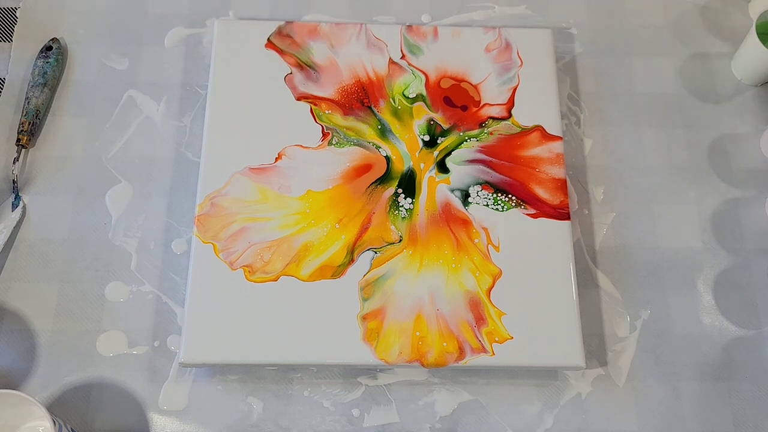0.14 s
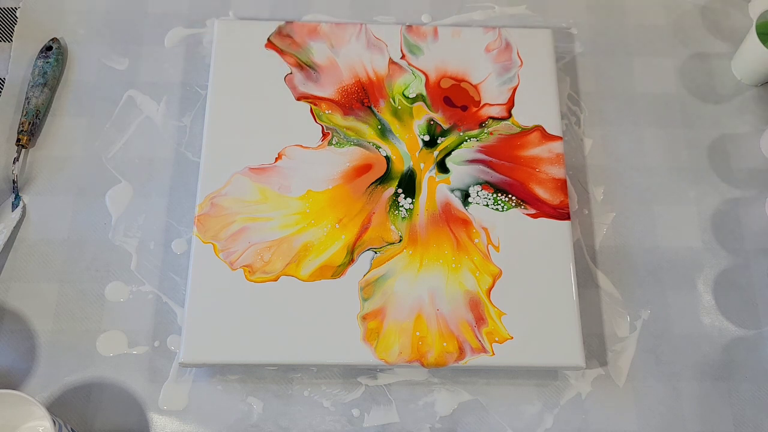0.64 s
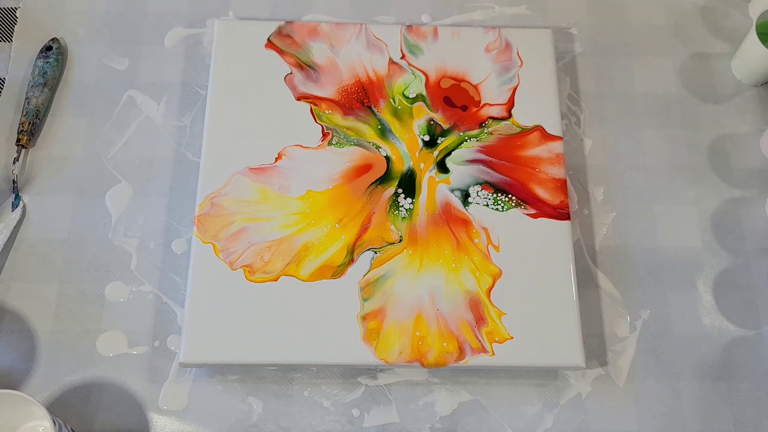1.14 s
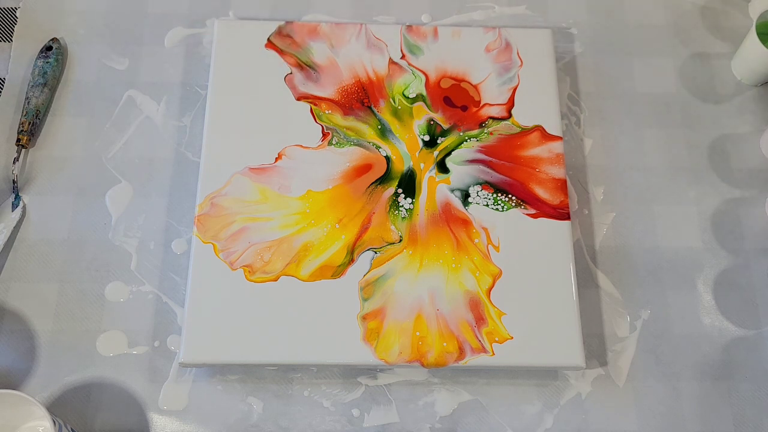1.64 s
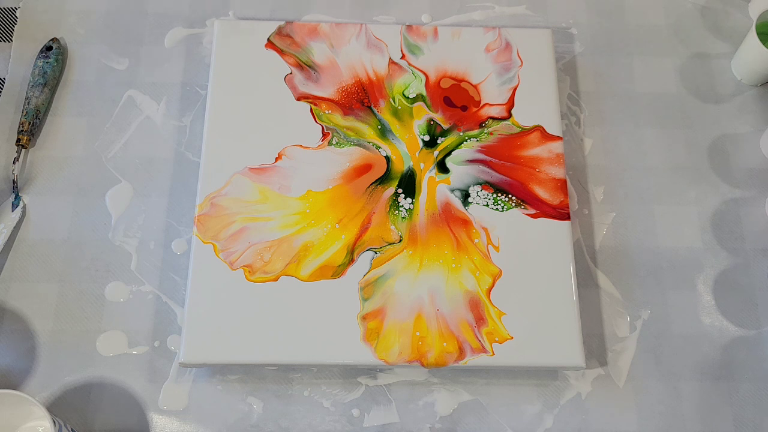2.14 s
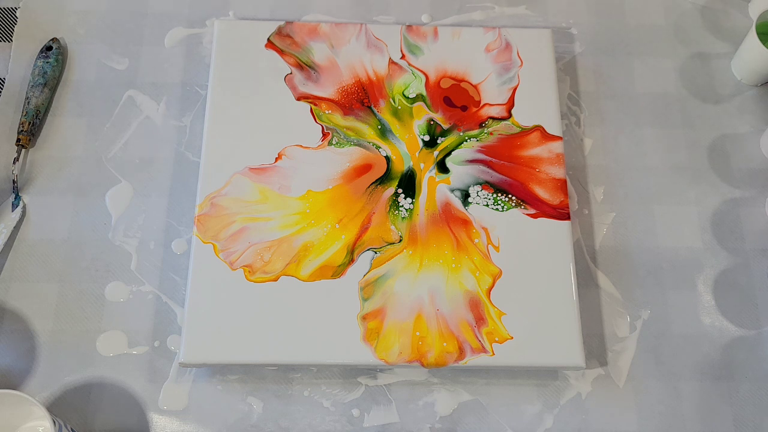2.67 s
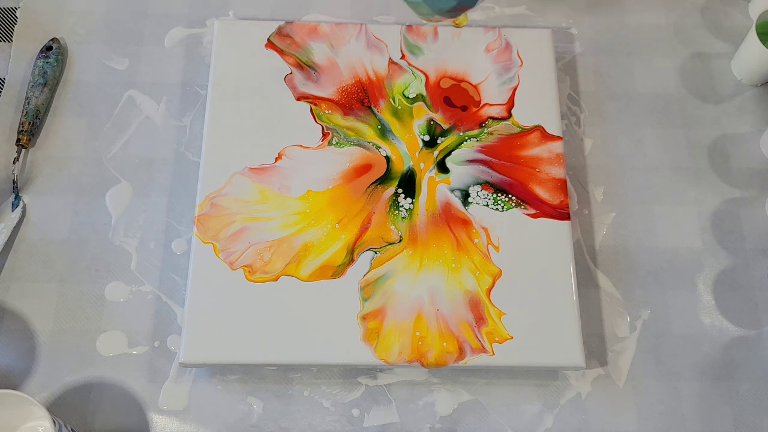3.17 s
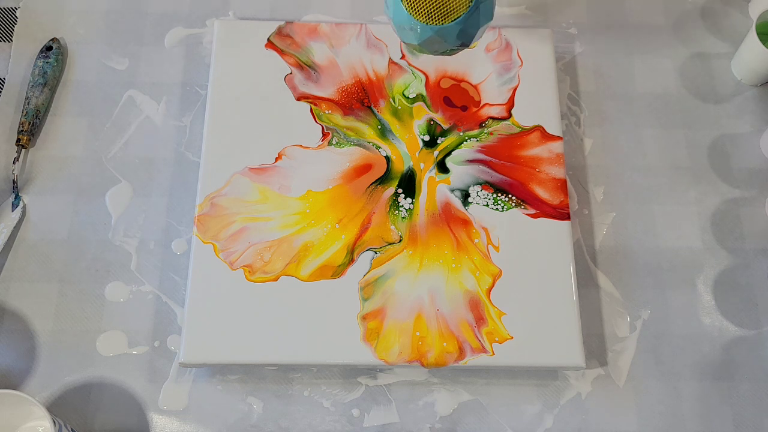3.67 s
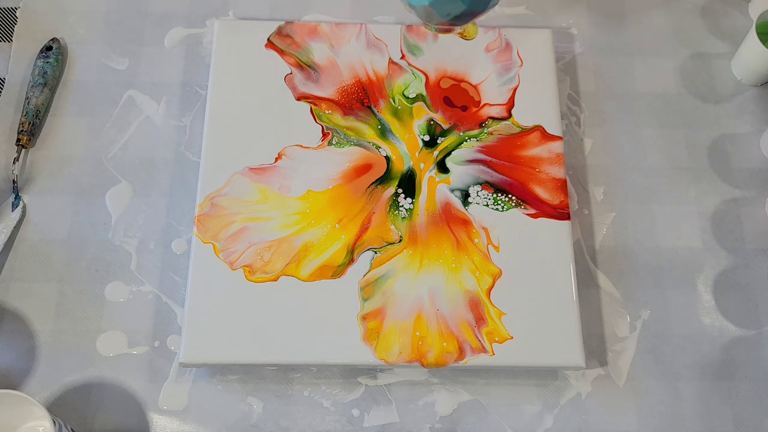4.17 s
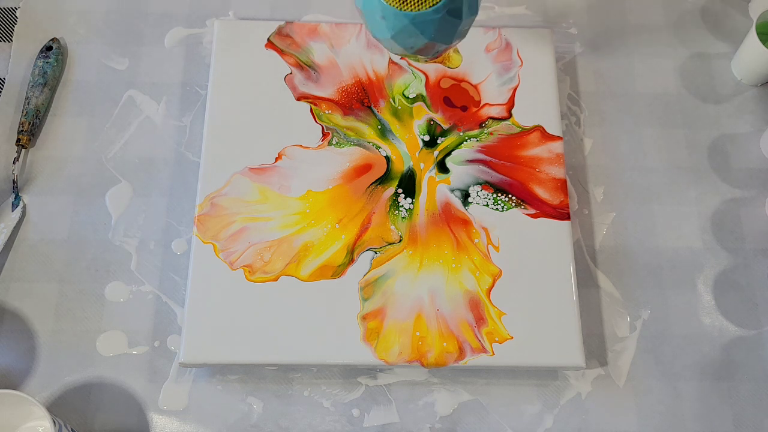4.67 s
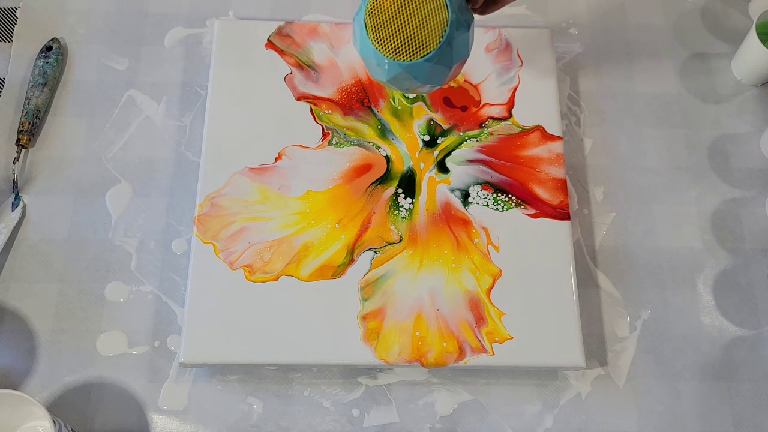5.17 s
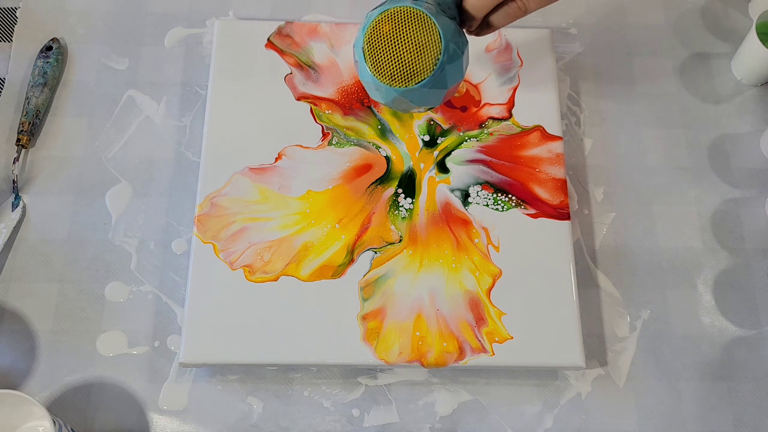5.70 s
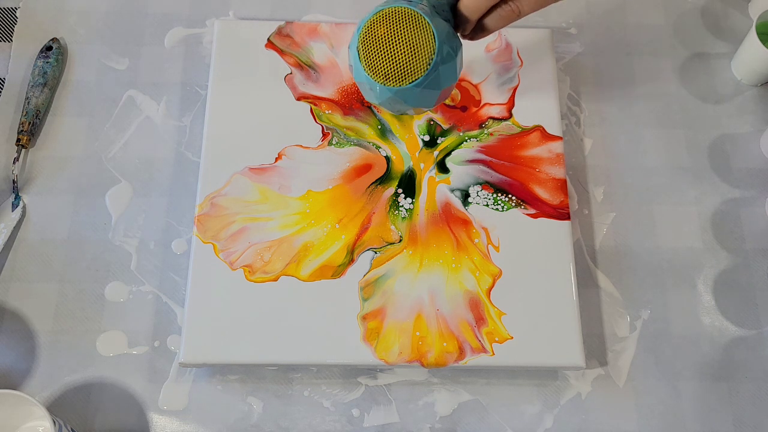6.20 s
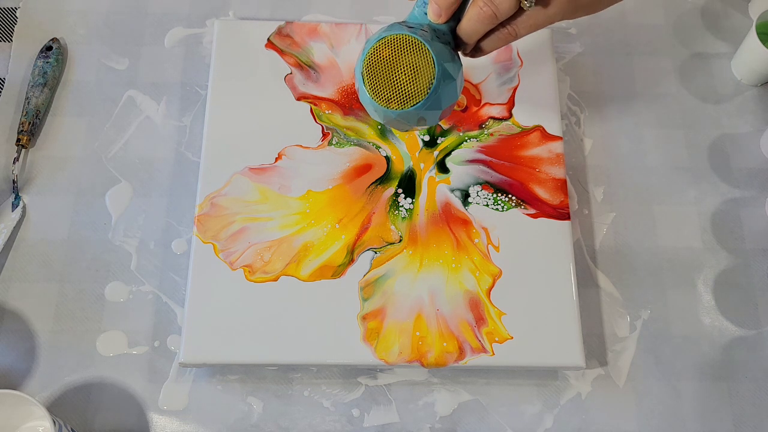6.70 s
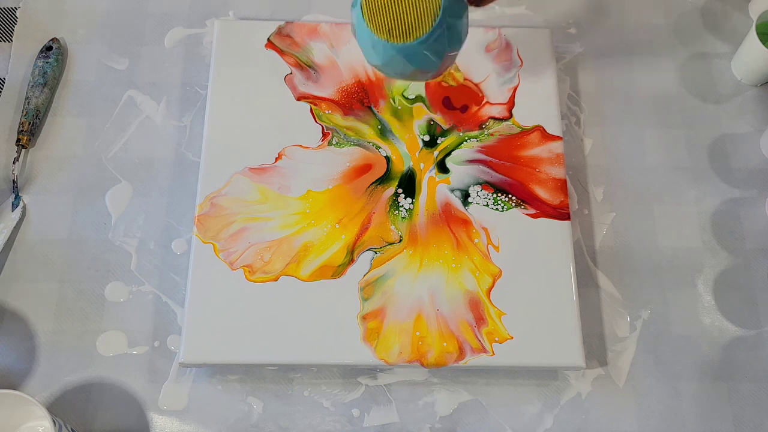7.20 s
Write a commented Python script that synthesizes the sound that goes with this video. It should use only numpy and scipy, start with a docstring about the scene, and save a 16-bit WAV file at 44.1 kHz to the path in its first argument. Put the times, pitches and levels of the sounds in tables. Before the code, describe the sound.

A sharp plastic click in a small room starts a handheld dryer, its motor tone climbing into a constant roar of air and piercing whine.

```python
"""In a small room a low machine hum (noise lines and a clean tone) lies under a faint hiss of handling.
The switch is touched, then thrown: bursts of rattle excite its housing modes, and the room answers.
The motor spins up exponentially; its tones climb with the turning rate past the casing modes.
Air roars through barrel and grille as turbulence noise, shaped by resonances and growing with speed.
The hand then moves the hair dryer about over a table: blade tone and a sliding airy band follow it."""
import sys
import numpy as np
from scipy import signal
from scipy.fft import rfft, irfft, next_fast_len
from scipy.io import wavfile

SR = 44100
rng = np.random.default_rng(int(sys.argv[2]) if len(sys.argv) > 2 else 0)


def field_ratio(decibels):
    """Amplitude ratio for a level in dB (20 dB per decade); scalars and array-likes work."""
    return 10 ** (np.asarray(decibels, dtype=float) / 20)


def materialize(psi):
    """Save the field psi as 16-bit PCM at rate SR to the path in sys.argv[1].

    A 1-D psi becomes a single channel; in a 2-D psi each row is a channel.
    """
    bounded = np.clip(np.atleast_2d(psi).T, -1, 1)
    quanta = np.round(bounded * 32767).astype(np.int16)
    wavfile.write(sys.argv[1], SR, quanta)


N = 323253
TIME_S = np.arange(N) / SR
SIZE = next_fast_len(N + SR // 2)   # room for half a second of echo
FREQ = np.maximum(np.fft.rfftfreq(SIZE, 1 / SR), 1)
LEFT_RIGHT = np.array([[1], [-1]])   # signs of an opposed (side) part
MAINS_HZ = 60


def rms_one(x):
    """Normalisation: scales a signal to unit root-mean-square."""
    return x / np.sqrt(np.mean(x ** 2) + 1e-20)


def in_time(rows):
    """Linear interpolation: each column after t becomes one value a sample."""
    s, *columns = np.transpose(rows)
    return np.array([np.interp(TIME_S, s, column) for column in columns])


def at_hz(points, hz=FREQ):
    """Spectral envelope: levels interpolated on a logarithmic frequency axis."""
    point_hz, level_db = np.array(points).T
    return np.interp(np.log(hz), np.log(point_hz), level_db)


def drift(rate_hz):
    """Low-pass random process: noise through two equal poles at rate_hz, scaled to unit rms."""
    r = np.exp(-80 * np.pi * rate_hz / SR)   # one step each 40 samples
    noise = rng.standard_normal(N // 40 + 2002)
    slow = rms_one(signal.lfilter([1], [1, -2 * r, r * r], noise)[2000:])
    return np.interp(np.arange(N) / 40, np.arange(len(slow)), slow)


def lorentzian(hz, centre_hz, width_hz):
    """Resonance curve: 1 at the centre, one half at half the width to either side."""
    return 1 / (1 + (2 * (hz - centre_hz) / width_hz) ** 2)


def to_time(spectra):
    """Fourier synthesis: spectra become samples."""
    return irfft(spectra, SIZE)[..., :N]


def stereo_noise(colour_db, side_db):
    """Partial coherence: left and right noise spectra share a mid part and oppose a side part."""
    mid, side = rfft(rng.standard_normal((2, SIZE)))
    return (mid + field_ratio(side_db) * side * LEFT_RIGHT) * field_ratio(colour_db)


def resonance(x, hz, width_hz):
    """Damped mode: a two-pole band-pass with gain near 1 at its peak."""
    r = np.exp(-np.pi * width_hz / SR)
    zeros = np.array([1, 0, -1]) * (1 - r * r) / 2
    poles = [1, -2 * r * np.cos(2 * np.pi * hz / SR), r * r]
    return signal.lfilter(zeros, poles, x + 1e-18)


def room_response(count, t60):
    """Diffuse reverberation: spectra of unrelated, exponentially dying noise, mean power 1."""
    lag = np.arange(SR // 2) / SR
    tails = rng.standard_normal((count, len(lag))) * field_ratio(-60 * lag / t60) * (lag > .002)
    return rfft(tails / np.sqrt(np.sum(tails ** 2, axis=1, keepdims=True)), SIZE)


# colour of the steady background: f/Hz, relative density/dB
BACKGROUND_COLOUR = [(18, -44), (30, -17), (120, -3.5), (182, -11), (359, -22.5), (410, -34), (546, -30),
                     (606, -35), (1050, -44), (3490, -48), (7260, -56), (8720, -52), (15500, -59)]
# its stereo width: f/Hz, side minus mid level/dB
BACKGROUND_SIDE = [(60, -18), (180, -13.5), (550, 3), (1650, 2), (4970, 1), (15000, -17)]
# noisy lines of the machine hum: f/Hz, width/Hz, rms level/dB
HUM_LINES = [(63, 4.8, -64), (102.3, 7.2, -57), (117, 4.5, -58.5), (153, 10, -69)]
# faint hiss of handling: t/s, rms level/dB
HANDLING_HISS = [(0.0, -66), (0.114, -79), (0.2, -74), (0.216, -71), (0.266, -83), (0.64, -99), (.7, -120)]


def room_tone():
    """Superposition of steady coloured noise, noisy hum lines, a wavering tone and a faint hiss."""
    side_db = at_hz(BACKGROUND_SIDE)
    out = field_ratio(-55) * rms_one(to_time(stereo_noise(at_hz(BACKGROUND_COLOUR), side_db)))
    for hz, width, db in HUM_LINES:
        shape_db = 20 * np.log10(lorentzian(FREQ, hz, width))
        out += field_ratio(db) * rms_one(to_time(stereo_noise(shape_db, side_db)))
    # clean part of the hum, at twice the mains rate
    out += field_ratio(-55 + 3.3 * drift(1.4)) * np.sqrt(2) * np.sin(4 * np.pi * MAINS_HZ * TIME_S)
    hiss = rms_one(to_time(stereo_noise(at_hz([(800, -30), (3000, 1), (16000, -1)]), -2)))
    return out + field_ratio(in_time(HANDLING_HISS)) * hiss


# moments at which the switch is touched and thrown: t/s, relative level/dB
SNAP_TIMES = [(0.213, -60), (0.312, -72), (0.658, -25.5), (0.674, -44)]
# modes of switch and housing: f/Hz, relative level/dB, decay time t60/s
HOUSING_MODES = [(945, -2, .012), (1370, 0, 0.0059), (1710, -7, .012), (2330, 3.5, 0.008),
                 (3460, -11, .008), (4600, -9, .006), (6300, -13, .004), (8440, -15, .003)]


def switch():
    """Impact excitation: milliseconds of rattle drive damped modes, and diffuse echoes follow."""
    kicks = np.zeros(N)
    for s, db in SNAP_TIMES:
        since = np.maximum(TIME_S - s, 0)
        kicks += field_ratio(db - 2.5) * (1 - np.exp(-since / 0.0011)) * np.exp(-since / 0.005)
    kicks *= rng.standard_normal(N)
    direct = 0.26 * signal.sosfilt(signal.butter(2, 900, "high", fs=SR, output="sos"), kicks)
    for hz, db, t60 in HOUSING_MODES:
        direct += field_ratio(db + 4.0) * resonance(kicks, hz, np.log(1000) / np.pi / t60)
    wall = 1 / (1 + 1j * FREQ / 12000)   # walls absorb the treble
    echoes = rfft(direct, SIZE) * wall * room_response(count=2, t60=0.37)
    return direct + field_ratio(4.5) * to_time(echoes)


TOP_SPEED_HZ, SWITCH_S, SPIN_UP_S = 249.75, .655, .36   # turns a second, onset, time constant


def turning_speed():
    """First-order response: the share of top speed rises exponentially towards 1."""
    return 1 - np.exp(-np.maximum(TIME_S - SWITCH_S, 0) / SPIN_UP_S)


def turn_angle():
    """Phase as the integral of frequency: the shaft angle in radians."""
    return 2 * np.pi * np.cumsum(TOP_SPEED_HZ * turning_speed()) / SR


# motor modes that brush noise keeps ringing in the casing: f/Hz, width/Hz, mid rms level at full speed/dB
BRUSHED_MODES = [(2499, 34, -49.5), (3367, 99, -52.5)]
# casing modes that a rising motor tone sweeps through: multiple, f/Hz, width/Hz, level/dB
SWEPT_MODES = [(8, 745, 9, -37.5), (10, 915, 9, -36.5)]


def casing():
    """Forced vibration: rising tones sweep through casing modes, and brush noise keeps others ringing."""
    turns, speed = turn_angle(), turning_speed()
    ringing = 0
    for k, hz, width, db in SWEPT_MODES:
        ringing = ringing + field_ratio(db) * resonance(resonance(np.sin(k * turns), hz, width), hz, 80)
    brushes = rng.standard_normal((2, N))
    for hz, width, db in BRUSHED_MODES:
        mid, side = rms_one(resonance(resonance(brushes, hz, width), hz, 3 * width))
        ringing = ringing + field_ratio(db) * speed ** 2.9 * (mid + 1.33 * side * LEFT_RIGHT)
    return ringing


# blade tone as the hand carries it through the standing waves:
# t/s, mean of left and right level at full speed/dB, left minus right level/dB
BLADE_PATH = [(2.2, -47, -10.5), (2.24, -38, -11), (2.31, -39.5, 3), (2.59, -39, -7), (2.73, -34.5, 2.0),
              (3.16, -40, -10), (3.5, -31, 7), (3.59, -35.5, 1.0), (3.69, -34.5, 6), (4.17, -32.5, 6),
              (4.31, -42.5, 6), (4.41, -36, 0.0), (4.77, -41, 4), (5.78, -34.5, 3.5), (5.83, -33, 11),
              (5.89, -37, 4.5), (5.94, -31.5, 10.5), (6.03, -37.5, 3), (6.37, -34, 7), (7.17, -36, 4),
              (7.33, -38.5, 9)]
# pitches where the climbing tone swells: f/Hz, width/Hz, boost/dB
PITCH_SWELLS = [(1330, 300, 8), (1845, 60, 6)]


def blade_level(speed, flutter_db=0.96):
    """Standing waves: left and right dB swell and fade during the climb, then follow the hand."""
    level_db, pan_db = in_time(BLADE_PATH)
    held = level_db + pan_db * LEFT_RIGHT / 2
    pitch_hz = 8 * TOP_SPEED_HZ * speed
    swell = sum(db * lorentzian(pitch_hz, hz, width) for hz, width, db in PITCH_SWELLS)
    # chance fades: the rising tone crosses peaks and nulls of the room
    climbing = -46 + swell + 2.5 * np.array([drift(8.3), drift(8.3)])
    settled = np.clip((TIME_S - 2.19) / .05, 0, 1)
    flutter = flutter_db * np.array([drift(23.0), drift(23.0)])
    growth = 3.5 * 20 * np.log10(speed + 1e-6)   # amplitude as speed to the power 3.5
    return climbing + settled * (held - climbing) + growth + flutter


# other tones of the motor: cycles per turn
TONE_MULTIPLES = [1, 5, 6, 15, 16, 20, 23, 24]
# mean level of each at full speed: left level/dB, right level/dB
TONE_LEVELS = [(-87, -65.5), (-50, -43.5), (-76, -62), (-74, -59.5), (-67, -56), (-57, -55.5), (-60, -71),
               (-62, -67)]


def motor(ripple=.2, waver_db=1.8, rise_db=85):
    """Harmonic series of the turning rate, its amplitude modulated by the rectified mains."""
    speed, turns = turning_speed(), turn_angle()
    out = field_ratio(blade_level(speed)) * np.sin(8 * turns)   # eight blades pass each turn
    for k, level_db in zip(TONE_MULTIPLES, TONE_LEVELS):
        waver = waver_db * np.array([drift(1.5), drift(1.6)])   # as the hand moves
        level = np.array(level_db)[:, None] + waver + rise_db * np.log10(speed + 1e-3)
        phase = rng.uniform(-1.1, 1.1, (2, 1))   # radians, differing at each microphone
        out += field_ratio(level) * np.sin(k * turns + phase)
    throb = np.sqrt(2) * (1 + ripple * np.sin(2 * np.pi * MAINS_HZ * TIME_S))
    return throb * out


# how far the hand turns the dryer away from the microphones: t/s, level/dB
HAND_AIM = [(.8, -7.5), (1.2, -5.5), (1.7, -5), (1.9, -3.5), (2.3, -4), (2.5, -1.5), (2.7, -1.5),
            (3.0, -0.5), (4.0, -0.5), (4.4, 0.3), (5.1, -0.64), (5.7, -0.5), (5.9, -2), (6.5, -0.4),
            (6.9, -2), (7.33, -1.2)]
# airy band that slides as the hand moves the nozzle: t/s, f/Hz, rms level at full speed and 0 dB aim/dB
SLIDING_PATH = [(2.2, 2460, -37), (3.2, 2587, -41), (3.3, 2442, -44), (4.26, 2473, -43), (4.3, 2580, -45),
                (5.17, 2460, -46.5), (7.3, 2500, -45), (7.33, 2530, -43)]


def sliding_band(width_hz=130, side_db=-20):
    """Quadrature modulation: low-pass noise on a moving carrier, stronger as the dryer turns to face."""
    hz, level_db = in_time(SLIDING_PATH)
    (aim_db,) = in_time(HAND_AIM)
    phase = 2 * np.pi * np.cumsum(hz) / SR
    low = signal.butter(2, width_hz / 2, fs=SR, output="sos")
    a, b = signal.sosfilt(low, rng.standard_normal((2, 2, N)))
    mid, side = rms_one(a * np.cos(phase) + b * np.sin(phase))
    stereo = mid + field_ratio(side_db) * side * LEFT_RIGHT
    return field_ratio(level_db + 2.1 * aim_db) * turning_speed() ** 3 * stereo


# stereo width of the echoes of the air: f/Hz, side minus mid level/dB
ECHO_SIDE = [(150, -8), (300, -4), (600, -2.5), (1200, -3), (1800, -8), (2600, -7), (4200, -5.5),
             (6500, -4), (8000, -6), (10000, -6.5), (12000, -4), (15000, -4.5)]
# tilt between the microphones: f/Hz, left minus right level/dB
LEFT_RIGHT_TILT = [(60, -1.0), (99, 1), (160, -22), (270, -2.5), (450, -0.5), (740, -0.5), (1220, 0.5),
                   (2010, 0.5), (3330, 0.5), (5500, -2.5), (9080, 1), (15000, 0)]


def air_at_microphones(colour_db, wet=0.45, t60=0.12, sway=1.5, lead=0.64, lead_top_hz=7600, diffuse=0.65):
    """Interference: one noise arrives direct and by echoes, whose pattern drifts as the dryer moves."""
    source, place = rng.standard_normal(N), sway * drift(0.55)
    late_noise = rng.standard_normal(N)
    signals = [source, source * np.cos(place), source * np.sin(place), late_noise]
    direct, here, there, late = rfft(signals, SIZE)
    echoes = room_response(count=4, t60=t60)
    mid = (direct + wet * (here * echoes[0] + there * echoes[1])) / np.sqrt(1 + wet ** 2)
    side = here * echoes[2] + there * echoes[3] + diffuse * late   # late echoes differ left and right
    side = field_ratio(at_hz(ECHO_SIDE)) * side / np.sqrt(1 + diffuse ** 2)
    # a phase lead: the left microphone hears it first
    side = side + 1j * lead * mid * np.sqrt(FREQ / lead_top_hz) * (FREQ < lead_top_hz)
    tilt_db = at_hz(LEFT_RIGHT_TILT) * LEFT_RIGHT / 2
    return (mid + side * LEFT_RIGHT) * field_ratio(colour_db + tilt_db)


# broad colour of the air: f/Hz, relative density/dB
AIR_COLOUR = [(150, -37.5), (300, -17), (520, -15), (620, -7), (1500, -12.5), (3000, -23), (7000, -28.5),
              (11000, -30), (16000, -26.5)]
# resonances of barrel, grille and table: f/Hz, width/Hz, boost/dB
AIR_RESONANCES = [(678, 59, 5), (779, 61, 3.5), (860, 34, 6), (959, 24, 6), (1100, 81, 4), (1800, 240, 6),
                  (2405, 550, 11), (3330, 420, 11), (4354, 750, 8), (5940, 640, 6), (8470, 1220, 10.5),
                  (9710, 1160, 5.5), (12600, 2900, 4)]
# low, middle and high parts of the rush, each: rms level at full speed and 0 dB aim/dB,
# power of the speed, share of the aim swing
LOW_ROAR = (-33, 2.8, 0.17)
MIDDLE_BARREL = (-34, 3, 1)
HIGH_GRILLE = (-35, 2.9, 1.21)


def rush(shared_db=.4, patchy_db=.7, flutter_db=.8):
    """Turbulence noise filtered by resonances; each third-octave band fluctuates a little on its own."""
    colour_db = at_hz(AIR_COLOUR)
    for hz, width, db in AIR_RESONANCES:
        colour_db = colour_db + db * lorentzian(FREQ, hz, width)
    spectra = air_at_microphones(colour_db)
    parts, together = np.zeros((3, 2, N)), drift(9.7)
    for centre in 125 * 2 ** np.arange(0, 7.3, 1 / 3):
        window = np.cos(np.pi / 2 * np.clip(3 * np.log2(FREQ / centre), -1, 1)) ** 2
        gain = field_ratio(shared_db * together + patchy_db * drift(1.04) + flutter_db * drift(27.0))
        part = int(centre > 1700) + int(centre > 4200)   # roar, barrel or grille
        parts[part] += gain * to_time(spectra * window)
    speed, (aim_db,) = turning_speed(), in_time(HAND_AIM)
    out = np.zeros((2, N))
    for (db, power, share), part in zip((LOW_ROAR, MIDDLE_BARREL, HIGH_GRILLE), parts):
        out += field_ratio(db + share * aim_db) * speed ** power * rms_one(part)
    return out


def scene():
    """Superposition: the pressures of all sources add at the microphone pair."""
    return room_tone() + switch() + casing() + motor() + sliding_band() + rush()


def roll_off(x):
    """The treble ends steeply here."""
    return signal.sosfilt(signal.butter(12, 17010, fs=SR, output="sos"), x)


def record(dry):
    """Band limitation: everything from 15730 Hz up is removed."""
    mix = to_time(rfft(dry, SIZE) * (FREQ < 15730))
    return roll_off(mix)


dry = scene()
out = record(dry)
materialize(out)
```